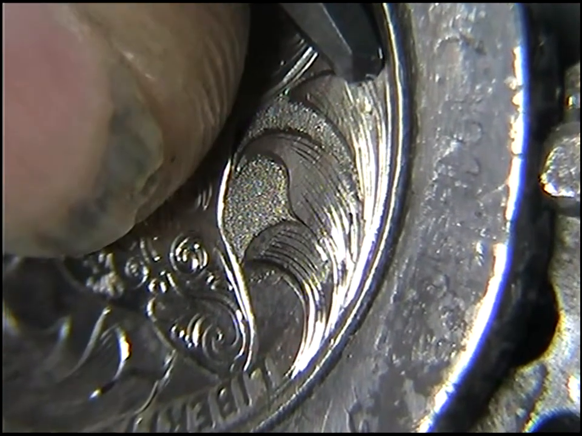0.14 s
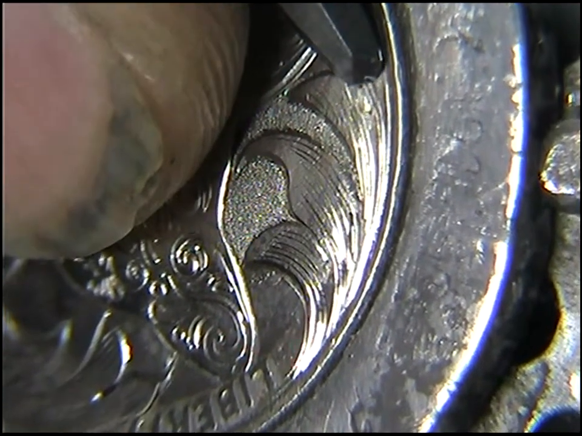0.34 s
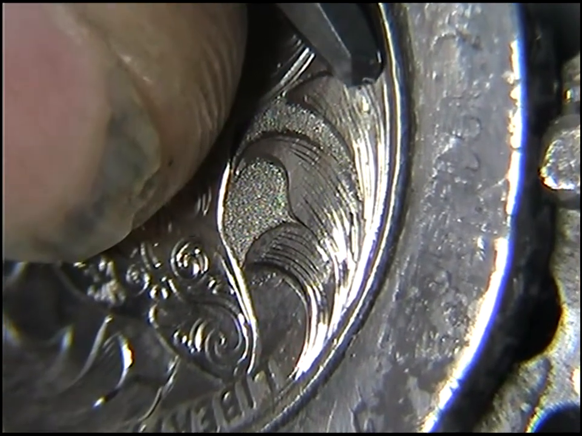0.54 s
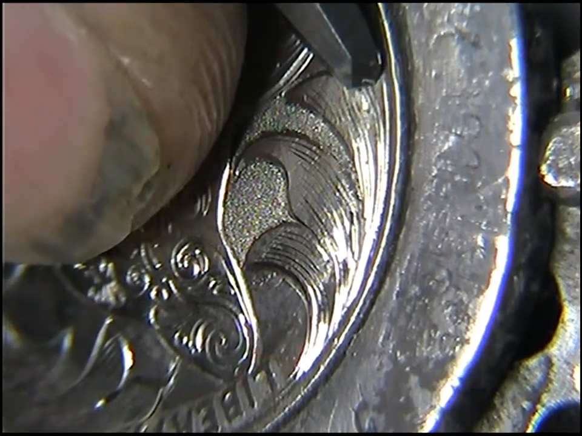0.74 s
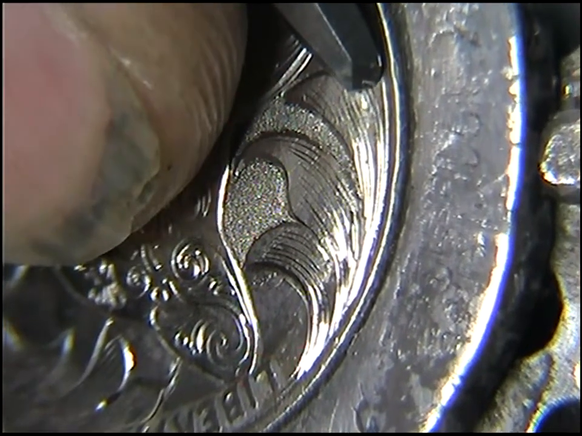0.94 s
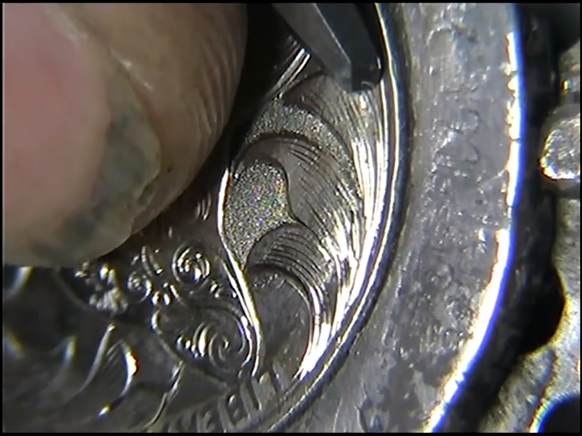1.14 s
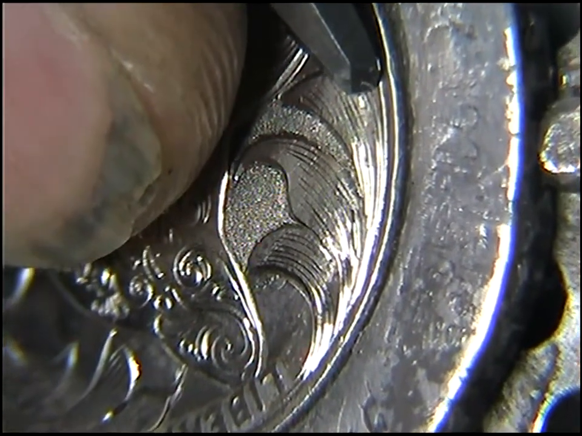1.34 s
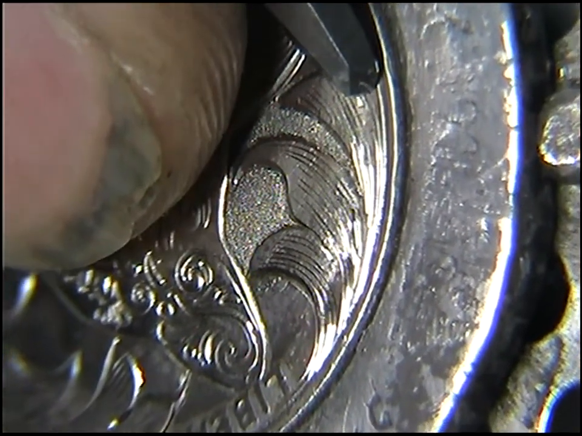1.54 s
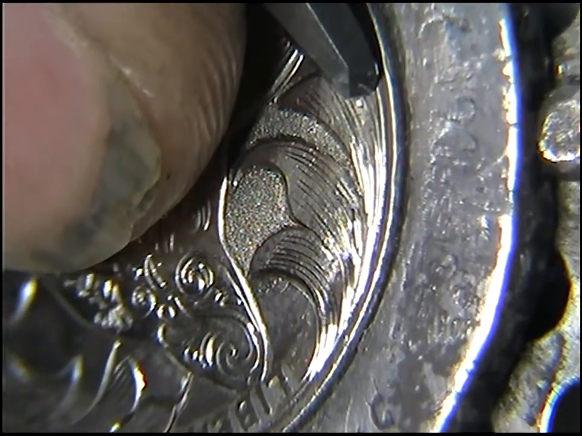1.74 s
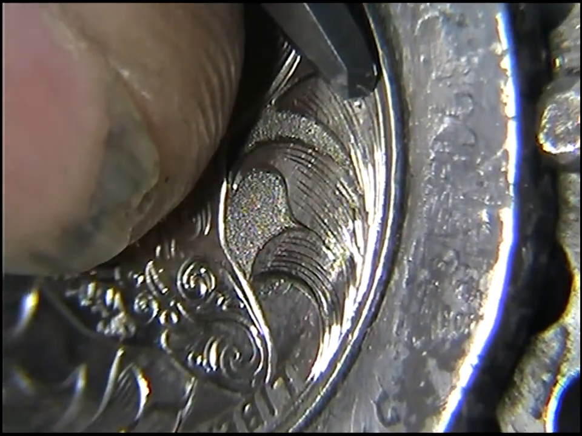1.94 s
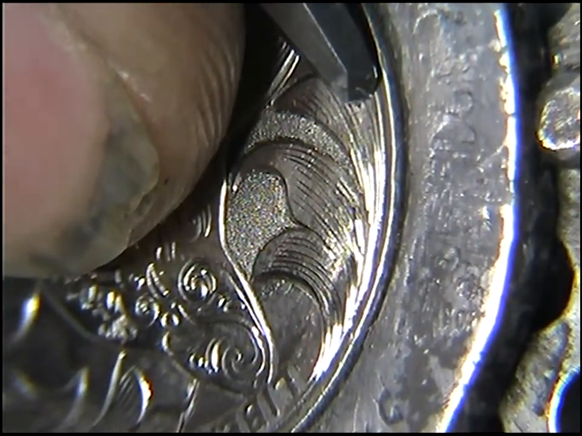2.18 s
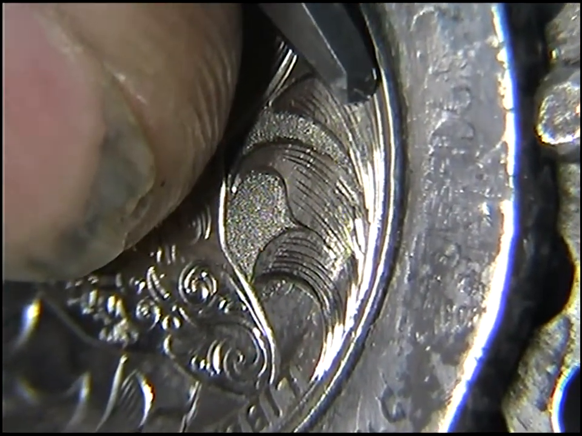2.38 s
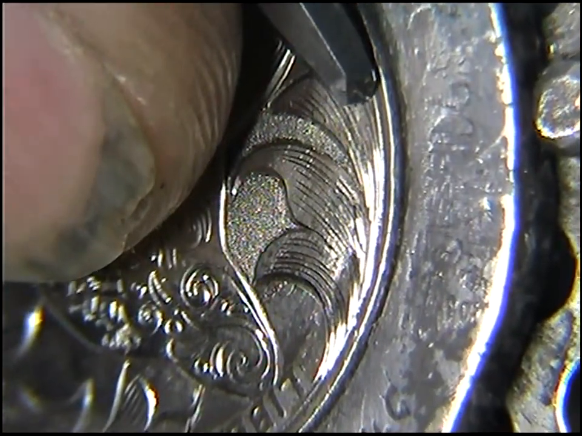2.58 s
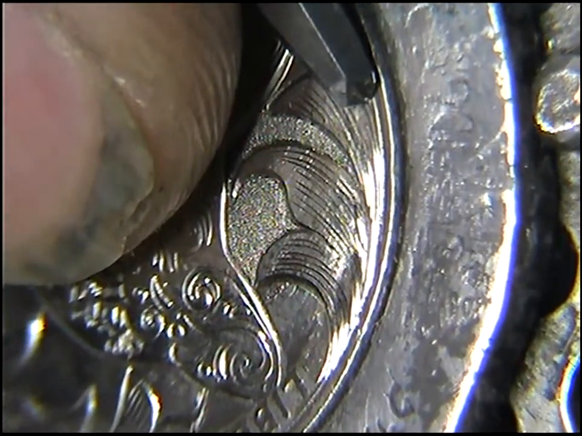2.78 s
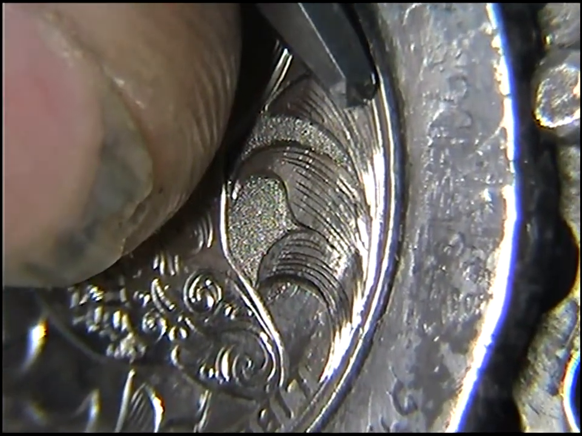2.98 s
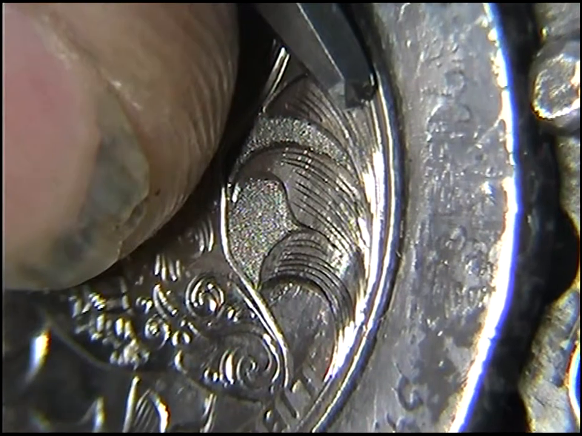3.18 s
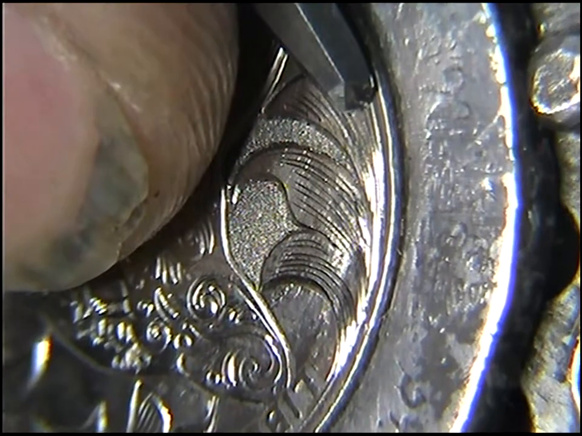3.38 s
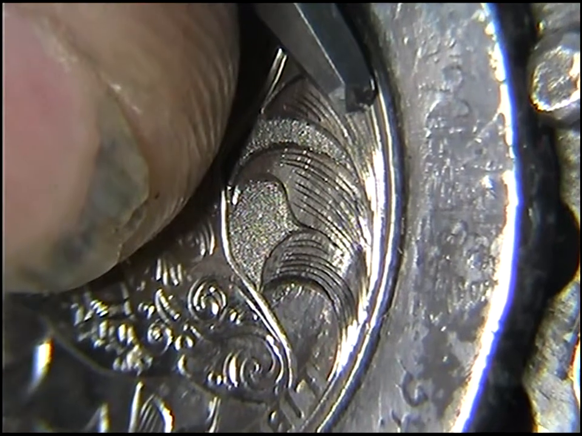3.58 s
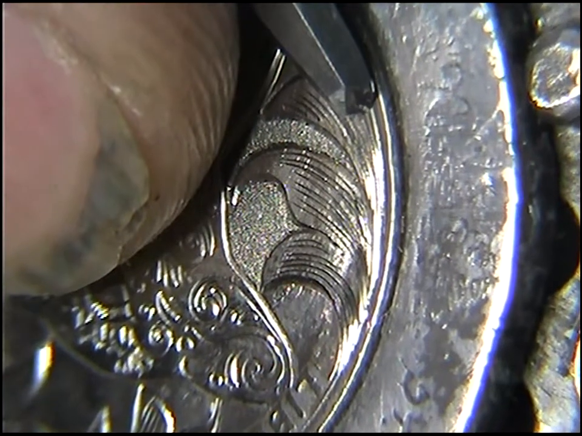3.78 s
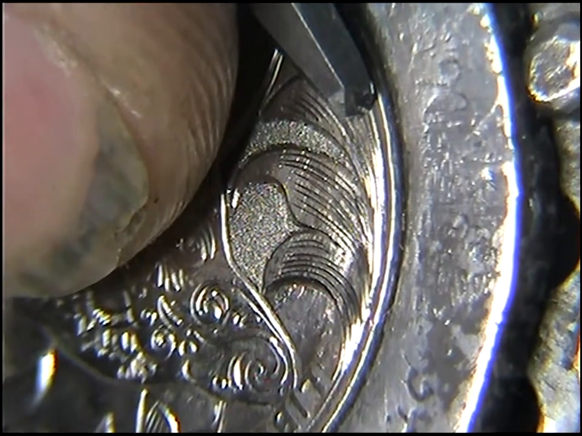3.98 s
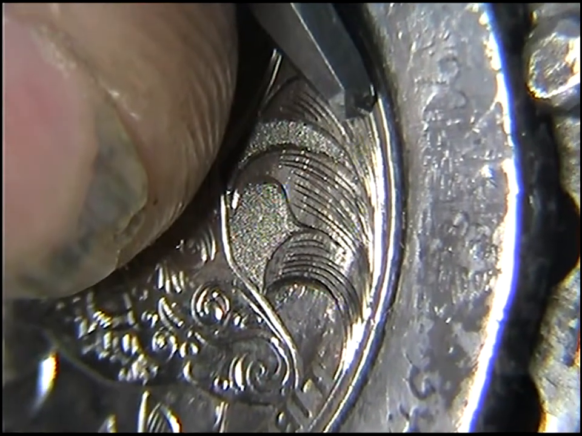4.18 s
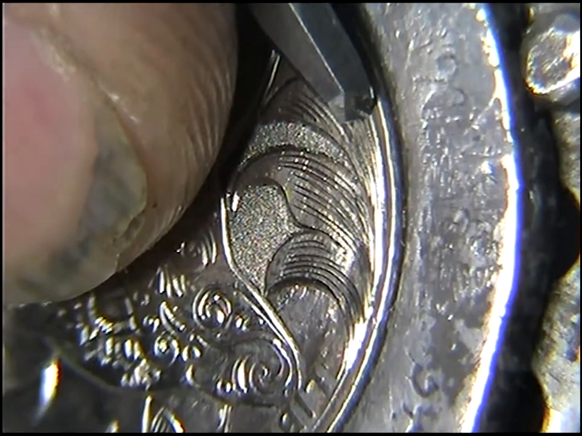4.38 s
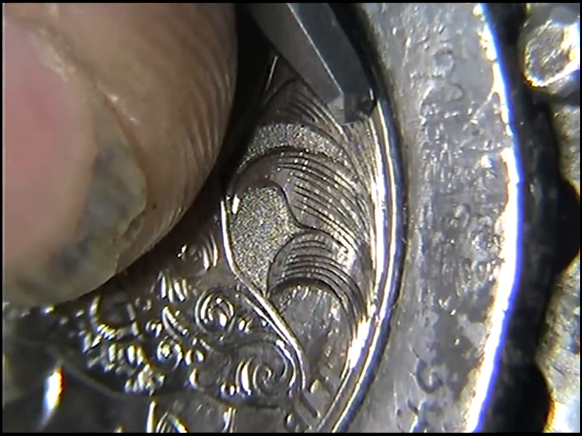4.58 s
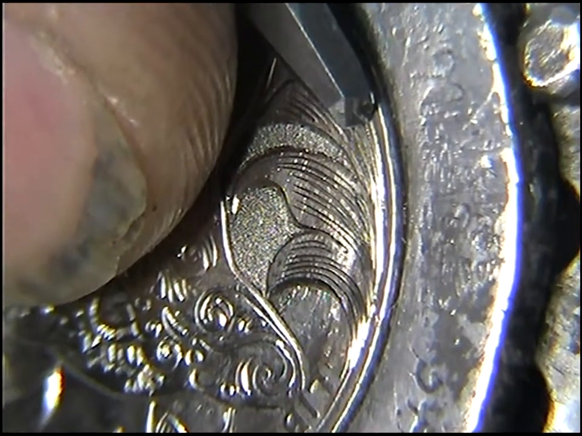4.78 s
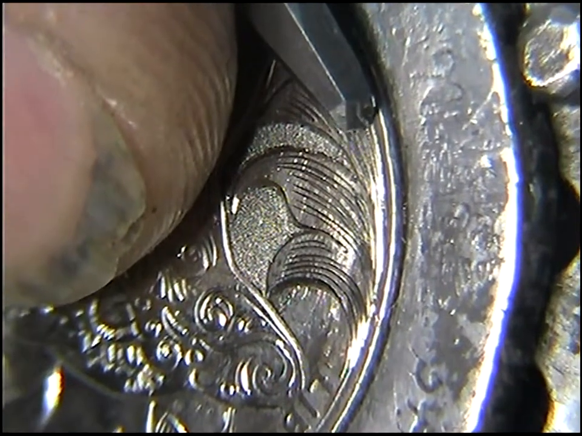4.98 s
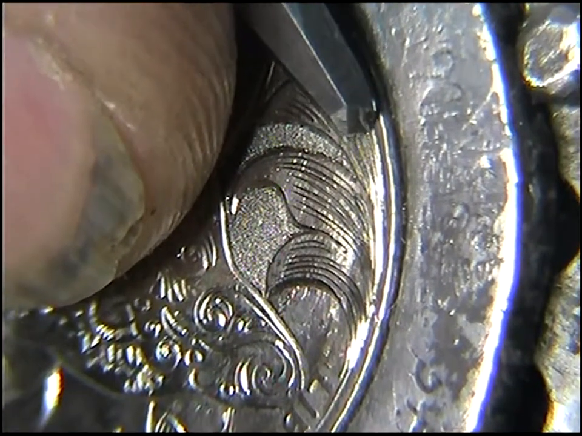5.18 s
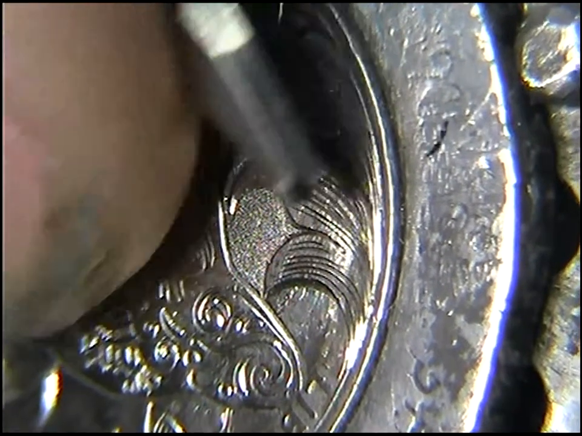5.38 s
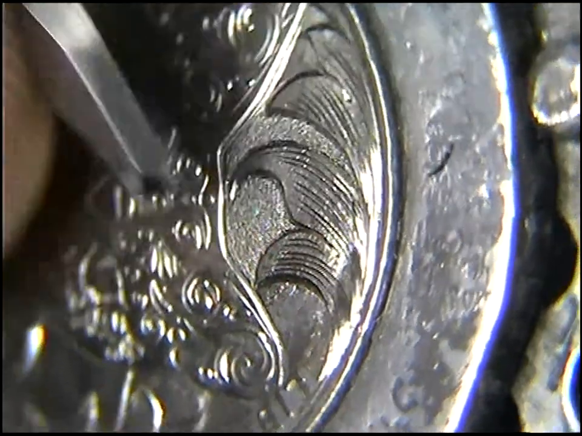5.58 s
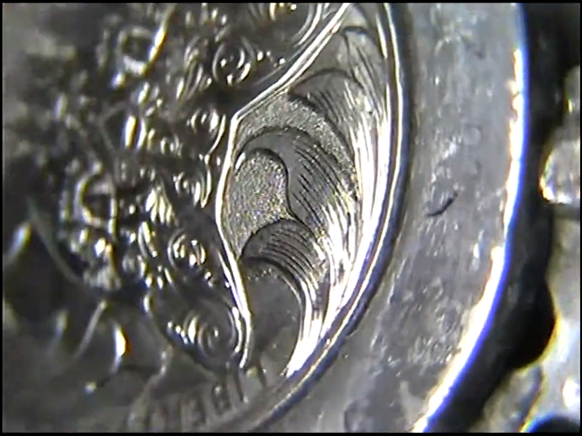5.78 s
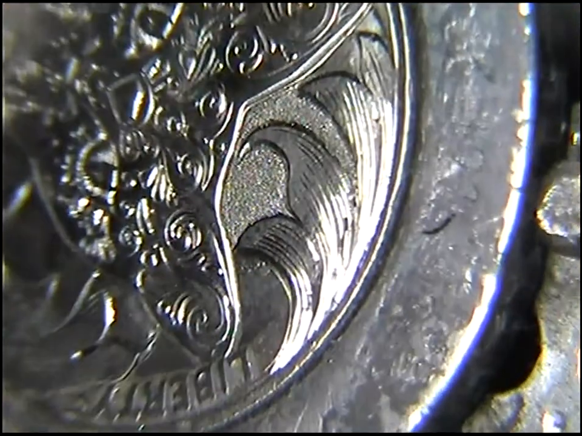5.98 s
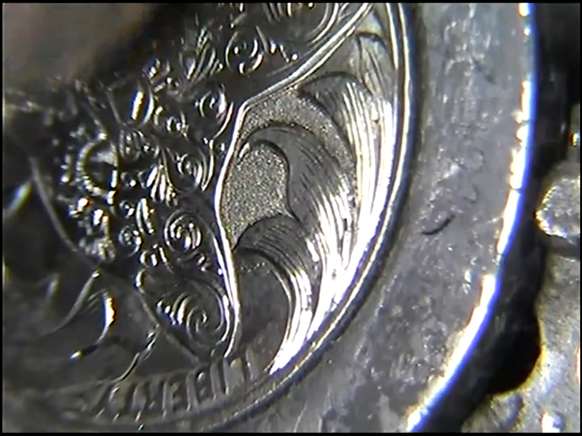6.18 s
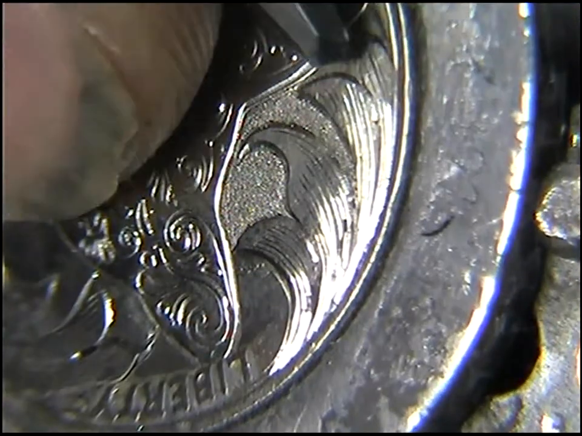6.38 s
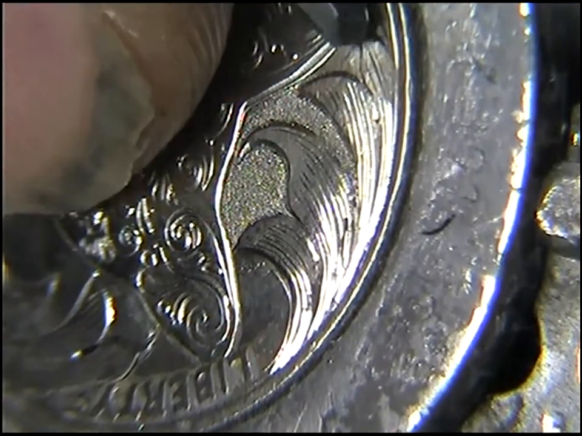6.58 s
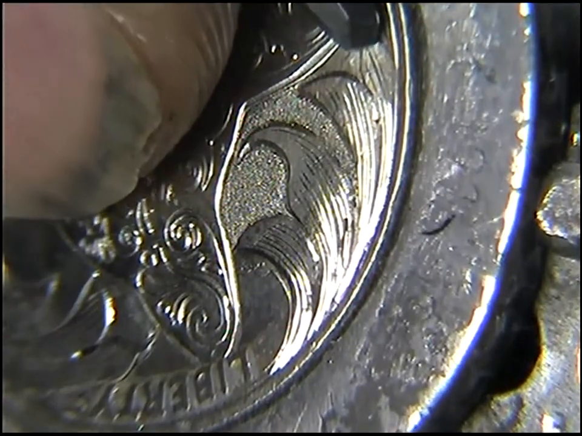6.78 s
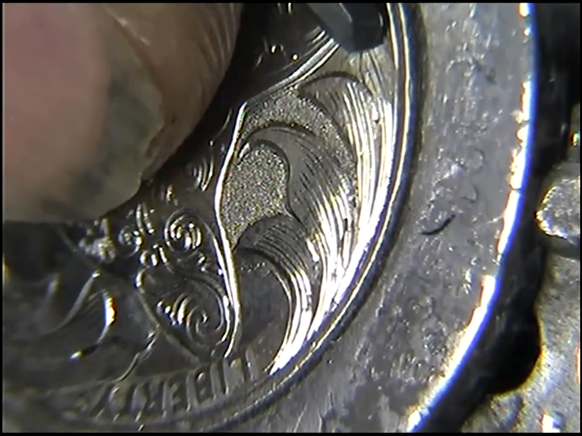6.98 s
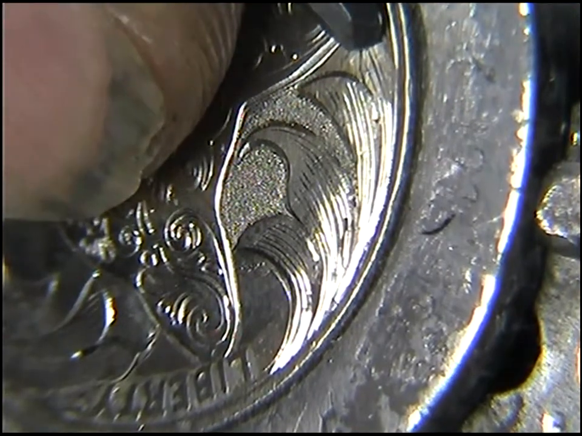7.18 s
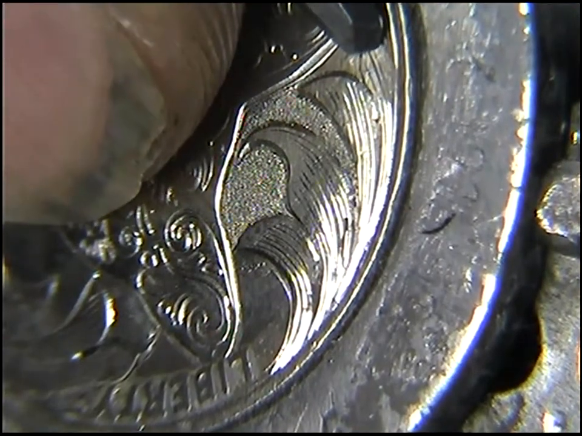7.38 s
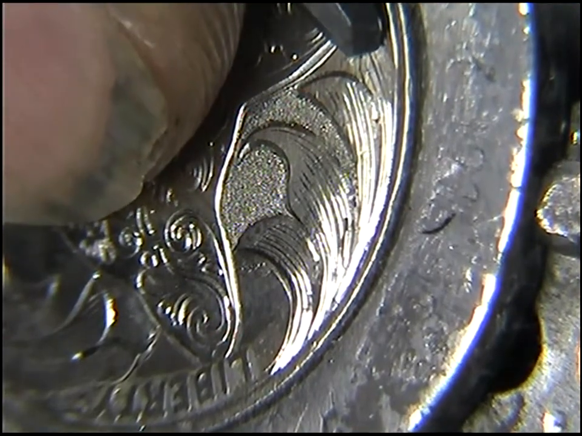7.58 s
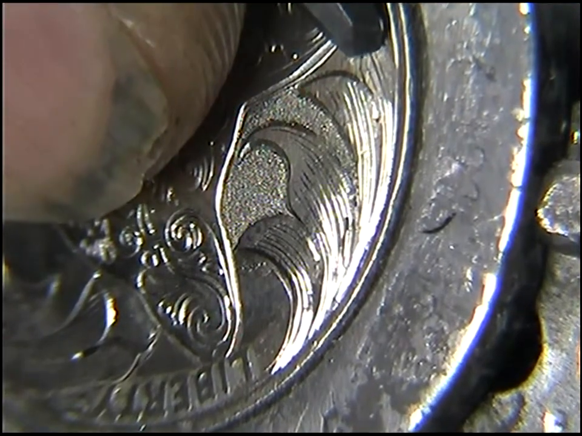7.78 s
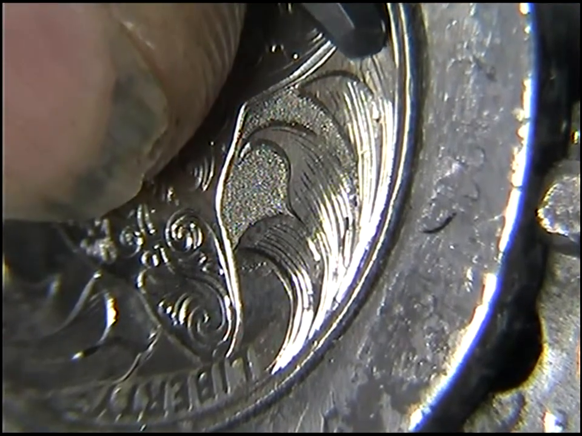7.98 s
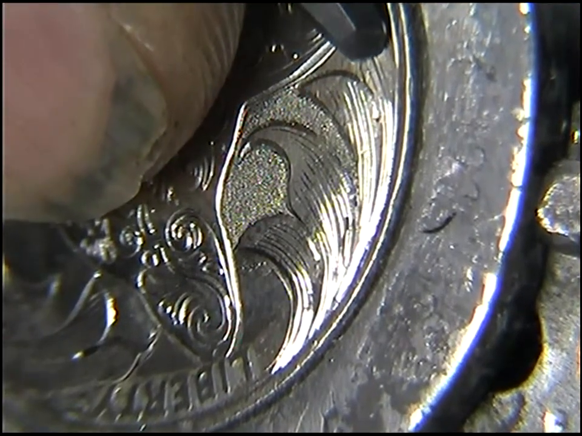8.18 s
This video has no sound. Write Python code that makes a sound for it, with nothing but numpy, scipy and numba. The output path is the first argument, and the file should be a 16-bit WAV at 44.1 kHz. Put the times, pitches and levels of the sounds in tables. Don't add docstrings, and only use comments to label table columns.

```python
import sys
import numpy as np
from scipy import signal
from scipy.fft import irfft
from scipy.io import wavfile
from scipy.ndimage import uniform_filter1d
from numba import njit

SR = 44100
rng = np.random.default_rng(int(sys.argv[2]) if len(sys.argv) > 2 else 0)


def amplitude_ratio(level_db):
    exponent = np.asarray(level_db, float) / 20
    return 10 ** exponent


def log_audio(samples):
    frames = np.atleast_2d(samples).T
    limited = np.clip(frames, -1, 1)
    pcm = np.round(limited * 32767).astype(np.int16)
    wavfile.write(sys.argv[1], SR, pcm)


N = 363825
TIME = np.arange(N) / SR

STROKE_HZ = 51.4
LIFT_S, LIFT_TAKES_S, TOUCH_S, SEAT_TAKES_S = 5.325, 0.013, 6.68, 0.68
PUMP_HZ, PUMP_STOP_S = 48.45, 1.06


def level(x, db):
    return x * amplitude_ratio(db) / np.sqrt(np.mean(x ** 2))


def at(table, hz):
    f, v = np.transpose(table)
    return np.interp(np.log(hz + 1), np.log(f + 1), v)


def ramp(start, length):
    return np.clip((TIME - start) / length, 0, 1)


def walk(rate, steps_per_s=SR):
    k = int(steps_per_s / rate)
    count = int(N / SR * steps_per_s) + 1
    held = np.repeat(rng.standard_normal(count // k + 1), k)
    return 1.39 * uniform_filter1d(held, k)[:min(count, N)]


# (frequency [Hz], lead of left [rad])
PORT_LEAD = [(0, 0), (2150, 0.3), (2410, 2.0), (2760, 0.6), (5250, 0.8), (7750, 1.5), (9910, 0.2),
             (11100, 1.3), (11400, 3.1), (11800, 0.8), (13000, 2.1), (13400, 1.7), (14000, -2.1),
             (16700, 4.1)]
# (frequency [Hz], left minus right [dB])
PORT_BALANCE = [(60, -2.5), (110, -3.0), (200, -4.0), (380, -4.0), (700, -5.0), (1290, -5.5), (2380, -3.0),
                (4400, -2.0), (8120, -2.5), (15000, -5.5)]


def ports(hz):
    half = amplitude_ratio(at(PORT_BALANCE, hz) / 2)
    return np.array([half + 0j, np.exp(-1j * at(PORT_LEAD, hz)) / half])


def place(z, hz):
    return (ports(hz)[:, None] * z).imag


# (frequency [Hz], likeness [-1 to 1])
COHERENCE = [(60, 0.75), (130, 0.85), (290, 0.92), (640, 0.89), (1410, 0.75), (3100, 0.53), (6820, 0.12),
             (15000, -0.09)]


def hiss(colour):
    hz = np.fft.rfftfreq(N, 1 / SR)
    alike = np.clip(at(COHERENCE, hz), 0, .99)

    def spectrum():
        return (rng.standard_normal(len(hz)) + 1j * rng.standard_normal(len(hz))) * amplitude_ratio(at(colour, hz))

    mid = spectrum() * np.sqrt(1 + alike)
    side = spectrum() * np.sqrt(1 - alike)
    return level(np.array([irfft(mid + side, N), irfft(mid - side, N)]), 0)


def tone(hz, db):
    phase = 2 * np.pi * np.cumsum(hz + 0 * TIME) / SR + 2 * np.pi * rng.random() + 0.13 * walk(2.7)
    size = np.sqrt(2) * amplitude_ratio(db + 0.96 * walk(2.6))
    return place(size * np.exp(1j * phase), np.mean(hz))


# (time [s], blow level [dB], lean [0-1])
EFFORT = [(0, -19.5, 0.55), (1.4, -19.5, 0.62), (2.3, -21, 0.69), (3.2, -21.5, 0.74), (4.3, -21.5, 0.84),
          (4.6, -23.5, 1), (5.08, -24.5, 0.96), (5.31, -27, 0.78), (5.35, -34, 0.4), (5.51, -28, 0.4),
          (5.74, -28.5, 0.24), (5.93, -38, 0.3), (6.18, -45.5, 0.23), (6.78, -49.5, 0.4),
          (7.26, -41.5, 0.5), (7.7, -34.5, 0.49), (7.88, -30, 0.58), (8.25, -26, 0.77)]


def effort(seconds):
    s, blow_db, lean = np.transpose(EFFORT)
    return np.interp(seconds, s, blow_db), np.interp(seconds, s, lean)


# (time [s], lag [ms])
BLOW_LAG = [
    (0.9, 6.61),
    (1.6, 6.8),
    (4.0, 9.05),
    (4.7, 9.1),
    (5.9, 7.65),
    (6.4, 6.0),
    (6.9, 5.64),
    (7.9, 5.54),
    (8.13, 5.84),
]


def blows():
    k = np.arange(int(N / SR * STROKE_HZ))
    port_ms = .075 - .04 * effort(k / STROKE_HZ)[1]
    jitter_ms = .011 * rng.standard_normal(len(k))
    late_ms = np.interp(k / STROKE_HZ, *np.transpose(BLOW_LAG)) - port_ms * (-1.) ** k + jitter_ms
    when = k / STROKE_HZ + late_ms / 1000
    stroke = np.clip(np.searchsorted(when + .5 / STROKE_HZ, TIME), 0, len(k) - 1)
    return stroke, 1000 * (TIME - when[stroke])


@njit
def resonate(force, stroke, poles, gains, port_gains):
    out, z = np.zeros((2, len(force))), np.zeros(len(poles), np.complex128)
    for i in range(len(force)):
        for m in range(len(poles)):
            z[m] = z[m] * poles[m] + force[i] * gains[m, stroke[i]]
            out[0, i] += (z[m] * port_gains[0, m]).imag
            out[1, i] += (z[m] * port_gains[1, m]).imag
    return out


RADIATION = {"bench": (80, 1000), "vise": (800, 2300), "coin": (2700, 3750), "shank": (4000, 8000),
             "tip": (8400, 16000), "handpiece": (1050, 16000)}
UNREST = {"bench": (.8, .3), "vise": (.7, .3), "coin": (.5, .3), "shank": (1.1, .8), "tip": (.8, .7),
          "handpiece": (1.0, 1.3)}


def ring(force, modes, part, stroke, neighbour=0.97):
    count = stroke[-1] + 1
    drift_db, scatter_db = UNREST[part]
    lean = effort(np.arange(count) / STROKE_HZ)[1]
    gains = []
    for m, (hz, width, db, lean_db) in enumerate(modes):
        drift = drift_db * walk(2.474, STROKE_HZ)[:count]
        scatter = scatter_db * rng.standard_normal(count)
        gains.append(neighbour ** m * width * amplitude_ratio(db + lean_db * lean + drift + scatter))
    hz, width = np.transpose(modes)[:2]
    poles = np.exp((2j * np.pi * hz - np.pi * width) / SR)
    out = resonate(force + 1e-18, stroke, poles, np.array(gains), ports(hz))
    low, high = RADIATION[part]
    band = signal.cheby2(4, 26, (low * .9, high * 1.08), "bandpass", fs=SR, output="sos")
    bass_cut = signal.butter(2, low * .7, "highpass", fs=SR, output="sos")
    return level(signal.sosfilt(np.vstack([band, bass_cut]), out), 0)


# (frequency [Hz], width [Hz], level [dB], gain at full lean [dB])
COIN_MODES = [(2888, 71, -6.5, 14.5), (2995, 110, 0.5, 2), (3166, 114, 7.5, -7), (3370, 100, -7, -20),
              (3511, 110, 4.5, -8), (3290, 420, -3, -5)]


def coin(tick, spray, stroke):
    return ring(tick + 0.51 * spray, COIN_MODES, "coin", stroke)


# (frequency [Hz], width [Hz], level [dB], gain at full lean [dB])
VISE_MODES = [(1030, 32, -0.5, 1), (1172, 44, 3, 12), (1338, 49, 2, 1), (1436.7, 44.4, 9, 1),
              (1611, 26, 9, 5), (1680, 14, 0, 3), (1820, 29, -2.5, -10), (1857.4, 55, 8, 7.5),
              (1930, 38, 3.5, -1.5), (2151, 34, 6.5, 10), (2390, 240, 4, 3), (1580, 590, -13, 11)]
# (frequency [Hz], width [Hz], level [dB], gain at full lean [dB])
BENCH_MODES = [(103, 46, -34, -16), (156, 90, -4, -13), (359.8, 14, 4.5, -11), (433.6, 37, -4, -8),
               (565.7, 3.3, -10, 7), (612.7, 10, -18, 13), (717, 17, -19, -5), (870, 30, -1, 7),
               (902, 30, 0.5, 11)]


def vise_and_bench(tick, settle, thinning, stroke):
    jaws = ring(tick + 0.18 * settle, VISE_MODES, "vise", stroke, neighbour=-0.99)
    return jaws + amplitude_ratio(-13 + 6 * thinning) * ring(tick, BENCH_MODES, "bench", stroke)


# (frequency [Hz], width [Hz], level [dB], gain at full lean [dB])
SHANK_MODES = [(4130, 280, -7, 5), (4660, 220, -6.5, 3), (5423, 180, 10, -12), (5980, 300, -18, 20.5),
               (6310, 310, -14.5, 17), (6850, 270, 3, -15), (7470, 40, 2, 3), (8180, 53, -3.5, 2.5),
               (6100, 970, -59, -28)]


def shank(shock, bounce, spray, stroke):
    return ring(0.4 * shock + 0.5 * bounce + 0.88 * spray, SHANK_MODES, "shank", stroke)


# (frequency [Hz], width [Hz], level [dB], gain at full lean [dB])
TIP_MODES = [(8120, 50, 2, 14), (9240, 160, 8.5, 2), (9570, 215, 3.5, -5.5), (11330, 260, -4, 4),
             (11700, 580, -11.5, 7), (13370, 500, -6.5, 18), (13300, 690, -7, -28)]


def tip(shock, bounce, spray, after_ms, stroke):
    chip = spray * np.exp(-np.abs(after_ms) / 2.7)
    return ring(0.6 * shock + 0.58 * bounce + 1.18 * chip, TIP_MODES, "tip", stroke)


# (frequency [Hz], width [Hz], level [dB], gain at full lean [dB])
HANDPIECE_MODES = [(1238, 280, 6.5, 5), (1740, 136, -10.5, 6), (2027, 185, 1.5, 8.5), (2594, 48, -3.5, 7.5),
                   (2918, 225, 2, 14.5), (3465, 190, 8, -27), (4415, 410, -5.5, 7.5),
                   (5150, 270, -0.5, -2.5), (6500, 130, 1.5, -4.5), (7455, 130, -7, 21),
                   (3770, 730, -8.5, -10), (11400, 2400, -48, -8)]


def handpiece(shock, settle, spray, stroke):
    return ring(shock + 0.33 * settle + 0.41 * spray, HANDPIECE_MODES, "handpiece", stroke)


PART_LEVELS = {"vise": (-8, 0.82, 19.5, -14), "shank": (-11.5, -0.13, 9, -8),
               "tip": (-8.5, 0.59, 12, -14.5)}


def graver():
    blow_db = effort(TIME)[0]
    lifted, back = ramp(LIFT_S, LIFT_TAKES_S), ramp(TOUCH_S, SEAT_TAKES_S)

    def part_db(part):
        first_db, gain_db, lifted_db, second_db = PART_LEVELS[part]
        first = (1 - lifted) * (first_db + gain_db * TIME)
        return first + (lifted - back) * lifted_db + back * second_db

    firm_db, rattle_per_db = -26, 1.01
    loose_db = back * rattle_per_db * np.maximum(firm_db - blow_db, 0)
    breakout_s, breakout_db = 0.66, 12
    thinning = (1 - lifted) * ramp(LIFT_S - breakout_s, breakout_s * 0.76)
    shank_db = part_db("shank") + loose_db / 2 + breakout_db * thinning
    tip_db = part_db("tip") + loose_db + 0.83 * thinning

    stroke, since_ms = blows()

    def pulse(delay_ms):
        return np.exp(-.5 * ((since_ms - delay_ms) / .016) ** 2)

    travel_ms, rebound_ms, settle_ms = .35, 0.7027, 1.536
    tick, shock, bounce = pulse(0), pulse(travel_ms), pulse(travel_ms + rebound_ms)
    settle = pulse(settle_ms)
    after_ms = since_ms - travel_ms
    grit, grit_ms = .11, 2.4
    spray = grit * (after_ms > 0) * np.exp(-np.abs(after_ms) / grit_ms) * rng.standard_normal(N)

    cut = coin(tick, spray, stroke)
    cut = cut + amplitude_ratio(part_db("vise")) * vise_and_bench(tick, settle, thinning, stroke)
    cut = cut + amplitude_ratio(shank_db) * shank(shock, bounce, spray, stroke)
    cut = cut + amplitude_ratio(tip_db) * tip(shock, bounce, spray, after_ms, stroke)
    free = amplitude_ratio(6.5) * handpiece(shock, settle, spray, stroke)
    seated, hovering = 0.97, 0.052
    contact = np.clip(seated + (hovering - seated) * (lifted - back), 0, 1)
    struck = amplitude_ratio(blow_db) * (contact * cut + np.sqrt(1 - contact ** 2) * free)
    return struck + amplitude_ratio(-49.5) * free


def bench_haze(near):
    t = np.arange(int(SR / 8)) / SR
    bench = rng.standard_normal((2, len(t))) * np.exp(-t / .016) * np.clip(t / .003, 0, 1)
    bench = signal.lfilter(*signal.butter(1, 5000, fs=SR), bench)
    return amplitude_ratio(-30.5) * signal.fftconvolve(near, bench, axes=1)[:, :N]


# (multiple of pump rate, level [dB])
PUMP_LINES = [(1, -59), (2, -55), (3, -45.5), (4, -47.5), (5, -49), (6, -60), (8, -50.5), (14.11, -53),
              (15, -56)]


def pump_hum():
    running = np.clip((PUMP_STOP_S - TIME) / 0.017, 0, 1)
    return running * sum(tone(m * PUMP_HZ, db) for m, db in PUMP_LINES)


# (level [dB], change while cutting [dB], change while the pump runs [dB])
MOTOR_LEVELS = [
    (-45, -7.5, 2),
    (-53.5, -9.5, 14),
    (-50, -6, -2),
]


def valve_motor():
    cutting, pumping = 1 - ramp(LIFT_S, 0.2), 1 - ramp(PUMP_STOP_S, .14)
    whine_hz = 312.8 + 5 * pumping
    bearing_hz = 716
    out = 0
    for hz, (rest_db, cut_db, pump_db) in zip((whine_hz, 2 * whine_hz, bearing_hz), MOTOR_LEVELS):
        out = out + tone(hz, rest_db + cut_db * cutting + pump_db * pumping)
    return out


def hush():
    return .42 * np.maximum(effort(TIME)[0] + 36, 0)


# (frequency [Hz], density [dB per Hz])
LEAK_COLOUR = [(700, -12), (1200, -8), (2800, -2), (3800, -3), (6500, 0), (9500, -1), (10900, -9.5),
               (16000, -16)]


def air_leak():
    return amplitude_ratio(-34.5 - 0.11 * hush() + 0.26 * walk(1.65)) * hiss(LEAK_COLOUR)


# (frequency [Hz], density [dB per Hz])
ROOM_COLOUR = [(30, -18), (50, -11), (85, -13.5), (150, 0.5), (600, -0.5), (1000, -2.5), (1500, -31)]


def room_noise():
    return amplitude_ratio(-48 - hush() + 0.2 * walk(2.91)) * hiss(ROOM_COLOUR)


# (frequency [Hz], density [dB per Hz])
PUFF_COLOUR = [(180, -35), (300, -27), (645, -20), (1720, -8), (2790, -15), (3520, -6), (5900, -14),
               (6850, -11.5), (16000, -38)]


def unloader_puff():
    start_s, hold_s, tail_s = 1.018, 0.021, 0.023
    since = TIME - start_s
    gush = np.clip(since / 0.0067, 0, 1) * np.exp(-np.maximum(since - hold_s, 0) / tail_s)
    return amplitude_ratio(-12) * gush * hiss(PUFF_COLOUR)


# (time [s], peak level [dB], frequency [Hz])
THUMPS = [(1.077, -29, 186), (1.129, -32, 178), (1.2, -39, 125), (1.266, -36, 172), (1.33, -35, 122),
          (1.389, -28, 155), (1.47, -32, 276), (1.58, -32, 183), (1.645, -36, 156), (1.682, -39, 125.8),
          (1.72, -29, 137), (1.812, -37, 147), (1.89, -34, 193), (1.969, -38, 145), (2.032, -37, 131),
          (2.099, -41, 153), (2.169, -38, 140), (2.255, -38, 287)]


def shudder():
    rise_s, fall_s = 0.034, 0.045
    rocking = 0
    for s, db, _ in THUMPS:
        rocking = rocking + amplitude_ratio(db) * np.exp(np.minimum((TIME - s) / rise_s, (s - TIME) / fall_s))
    out = amplitude_ratio(-13) * rocking * hiss([(30, -13), (60, -8), (140, 4.5), (300, -2), (500, -43)])
    out = out + amplitude_ratio(-12) * rocking * hiss([(150, -43), (380, -1), (900, -2), (1400, -22)])
    t = np.arange(int(SR / 5)) / SR
    for s, db, hz in THUMPS:
        i = int(s * SR)
        thump = t / 0.012 * np.exp(1 - t / 0.0064 + 2j * np.pi * hz * t)
        out[:, i:i + len(t)] += amplitude_ratio(db) * place(thump, hz)
    return out


def scene():
    near = graver()
    machines = pump_hum() + valve_motor()
    air = air_leak() + room_noise()
    cut_out = unloader_puff() + shudder()
    return near + bench_haze(near) + machines + air + cut_out


def roll_off(x):
    return signal.sosfilt(signal.butter(12, 17150, fs=SR, output="sos"), x)


def record(dry):
    knee_db, squeeze = -24, 0.24
    power = uniform_filter1d(np.mean(dry ** 2, axis=0), size=SR // 8)
    gain = (1 + power / amplitude_ratio(2 * knee_db)) ** (-squeeze / 2)
    top = signal.ellip(6, .3, 30, 15900, fs=SR, output="sos")
    mix = np.clip(signal.sosfilt(top, gain * dry), -1, 1)
    return roll_off(mix)


dry = scene()
out = record(dry)
log_audio(out)
```